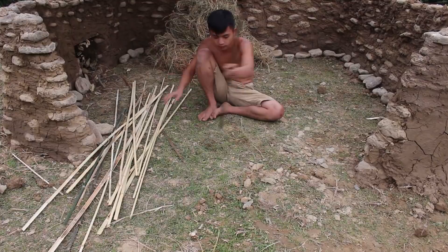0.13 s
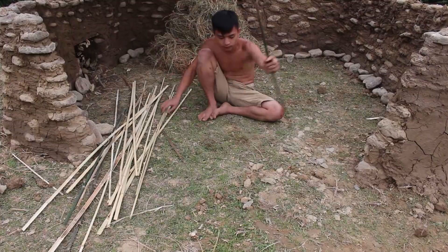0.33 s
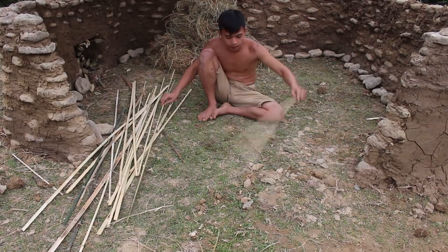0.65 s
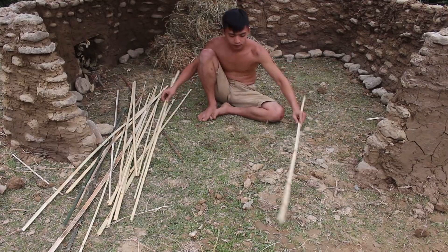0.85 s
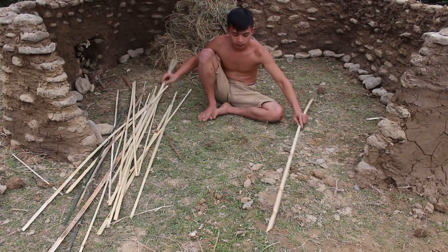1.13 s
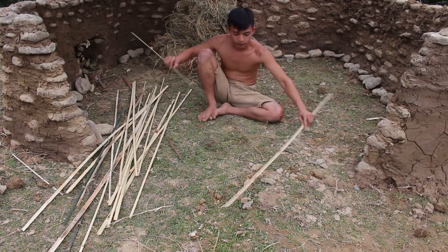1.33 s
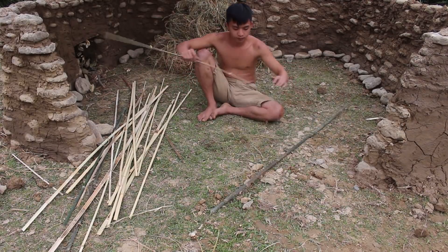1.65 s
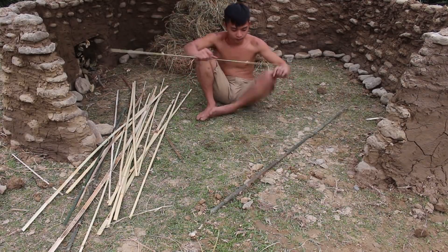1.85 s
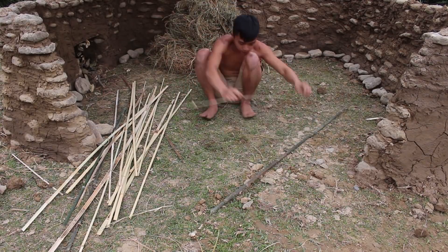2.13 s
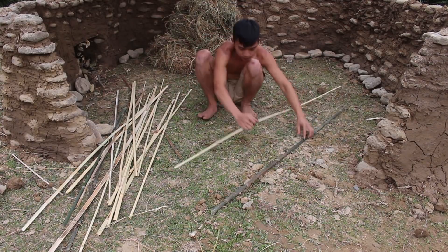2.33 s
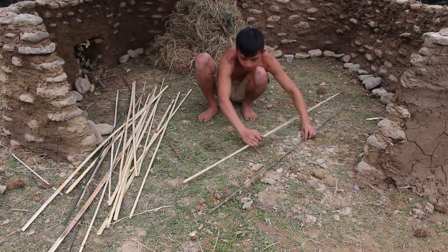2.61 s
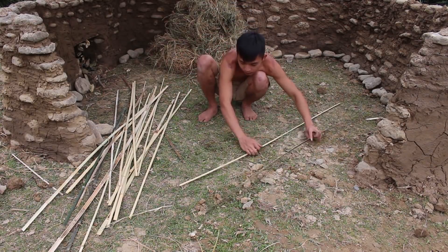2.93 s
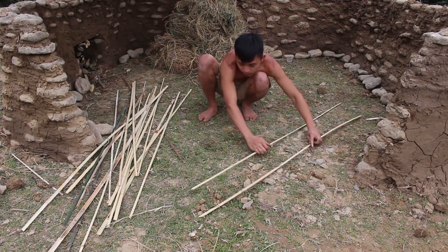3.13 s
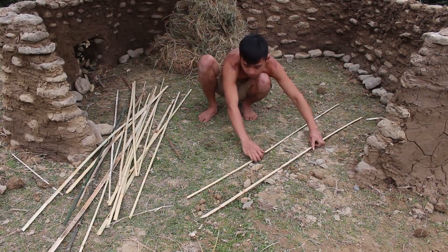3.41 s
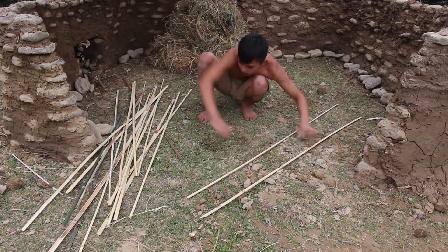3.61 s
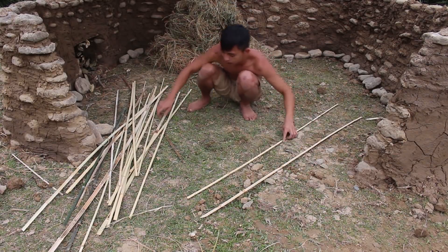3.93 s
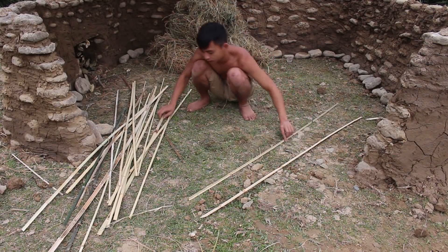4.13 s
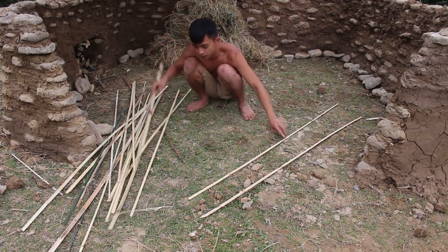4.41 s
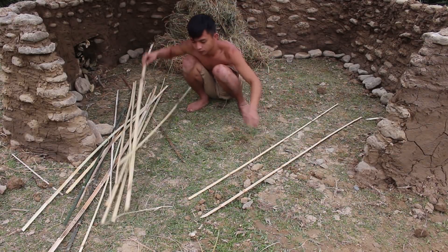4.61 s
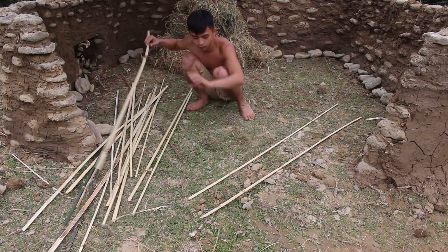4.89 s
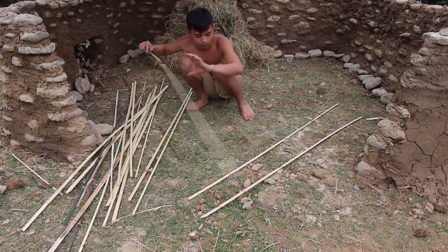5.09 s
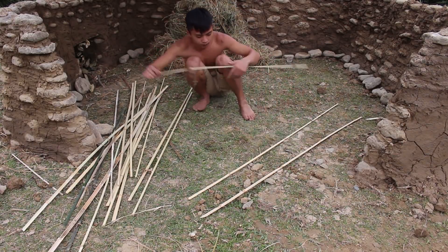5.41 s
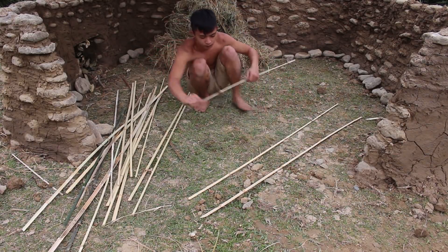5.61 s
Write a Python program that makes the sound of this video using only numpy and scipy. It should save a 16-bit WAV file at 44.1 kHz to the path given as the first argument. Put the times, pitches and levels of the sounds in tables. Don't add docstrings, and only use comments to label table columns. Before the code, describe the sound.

Thin split bamboo poles are laid on short grass in a small stone-walled yard: dry ticks, hollow little knocks and raspy slides in the first few seconds. After a near lull, a pole is dragged from the pile, rattling quickly and snapping free with a sharp crack. Faint grass brushing and one tiny falling bird note end it. A soft brook murmurs throughout. Close, slightly left-leaning stereo pickup with little bass.

```python
import sys
import numpy as np
from scipy import signal
from scipy.io import wavfile

SR = 44100
rng = np.random.default_rng(int(sys.argv[2]) if len(sys.argv) > 2 else 0)


def voltage_ratio(decibels):
    exponent = np.asarray(decibels, float) / 20
    return 10 ** exponent


def to_wav(sig):
    pcm = np.clip(np.atleast_2d(sig), -1, 1) * 32767
    pcm = np.round(pcm).astype(np.int16)
    wavfile.write(sys.argv[1], SR, pcm.T)


N = 253575


def in_time(rows):
    s, *columns = np.transpose(rows)
    return [np.interp(np.arange(N) / SR, s, c) for c in columns]


def at_hz(points, hz):
    f, value = np.transpose(points)
    return np.interp(np.log(hz), np.log(np.maximum(f, 1)), value)


def rms_one(x):
    return x / np.sqrt(np.mean(x ** 2) + 1e-20)


def drift(rate_hz):
    r = np.exp(-40 * np.pi * rate_hz / SR)
    noise = rng.standard_normal(N // 20 + 4002)
    slow = signal.lfilter([1], [1, -2 * r, r * r], noise)[4000:]
    return np.interp(np.arange(N) / 20, np.arange(len(slow)), rms_one(slow - slow.mean()))


def ring(x, hz, width_hz):
    r = np.exp(-np.pi * width_hz / SR)
    w = 2 * np.pi * hz / SR
    return signal.lfilter([0, np.sin(w)], [1, -2 * r * np.cos(w), r * r], x + 1e-18)


def modes(blow, table, scale, detune):
    total = 0
    for k, (hz, width_hz, db) in enumerate(table):
        total = total + (-1) ** k * voltage_ratio(db) * ring(blow, scale * hz * (1 + detune[k]), scale * width_hz)
    return total


def grains(shape, per_s, spread_db):
    size = voltage_ratio(spread_db * np.minimum(rng.exponential(1, shape), 4)) * rng.choice([-1, 1], shape)
    return size * (rng.random(shape) < per_s / SR)


def coloured(source, spectrum, patchy_db, flicker_hz, likeness, lean_db):
    out = 0
    edges_hz = 16500 * 2 ** (np.arange(-29, 1) / 3)
    for k, (low, high) in enumerate(zip(edges_hz, edges_hz[1:])):
        hz = np.sqrt(low * high)
        if not spectrum[0][0] < hz < spectrum[-1][0]:
            continue
        band = signal.butter(2, [low, high], "band", fs=SR, output="sos")
        mid, side = signal.sosfilt(band, source[k % 2])
        c = np.clip(at_hz(likeness, hz), -1, 1)
        gain = voltage_ratio(at_hz(spectrum, hz) + patchy_db * drift(flicker_hz))
        gain = gain * voltage_ratio(at_hz(lean_db, hz) / 2 * np.array([[1], [-1]]))
        out = out + gain * (np.sqrt(1 + c) * mid + np.sqrt(1 - c) * side * [[1], [-1]])
    return rms_one(out)


def brook():
    # f/Hz, density/dB
    wash_spectrum = [(15, -56), (26, -21), (48, -8), (97, -4.5), (221, -4), (289, -4.5), (331, -4.5),
                     (456, -6.5), (596, -4), (663, -3.5), (1290, -7.5), (1690, -4), (2600, -8.5),
                     (3130, -9.5), (15600, -26)]
    # f/Hz, correlation
    wash_likeness = [(60, 0.7), (130, 0.05), (290, -0.45), (640, 0.13), (1410, 0.23), (3100, -0.21),
                     (6820, -0.2), (15000, -0.17)]
    # f/Hz, lean/dB
    wash_lean = [(60, 2.5), (250, 1.5), (1000, 1), (4000, -1.5), (15000, 0.5)]
    wash = coloured(rng.standard_normal((2, 2, N)), wash_spectrum, patchy_db=1.2, flicker_hz=27,
                    likeness=wash_likeness, lean_db=wash_lean)
    born = grains((2, N), per_s=170, spread_db=4.5)
    dealt = rng.integers(0, 16, N)
    bubbles = 0
    for k, hz in enumerate(np.geomspace(400, 2700, 16)):
        onset = ring(born * (dealt == k), hz, 0.097 * hz)
        bubbles = bubbles + ring(onset, hz, 0.27 * hz) * hz ** 1.32
    return voltage_ratio(-51) * (0.91 * wash + 0.37 * rms_one(bubbles))


def bird():
    # t/s, f/Hz, level/dB
    whistle = [
        (5.36, 5750, -90),
        (5.38, 5680, -63),
        (5.43, 5350, -64),
        (5.47, 5150, -86),
    ]
    hz, db = in_time(whistle)
    return voltage_ratio(db) * (db > -89) * np.sin(2 * np.pi * np.cumsum(hz) / SR)


def yard(x):
    t60_s, level_db, cut_hz = 0.073, -10.5, 18000
    t = np.arange(round(.2 * SR)) / SR
    echoes = grains((2, len(t)), per_s=1800, spread_db=-1.0) * voltage_ratio(-60 * t / t60_s)
    echoes = echoes * (t > .003)
    echoes = signal.lfilter(*signal.butter(1, cut_hz, fs=SR), echoes)
    echoes /= np.sqrt(np.sum(echoes ** 2, axis=1, keepdims=True))
    return voltage_ratio(level_db) * signal.fftconvolve(x[None], echoes, axes=1)[:, :N]


def strokes():
    # peak t/s, fine rasp/dB, coarse rasp/dB, swell/s, fade/s (both over 20 dB)
    slides = [(0.0, -60.5, -72, .05, .15), (0.19, -62, -56.5, .03, .3), (0.35, -57, -58, 0.31, 0.17),
              (0.89, -55.5, -55, 0.075, 0.14), (0.99, -62, -67, .1, .12), (1.21, -48, -45, 0.059, 0.11),
              (1.49, -58, -50.5, 0.026, 0.26), (1.65, -72, -63, .04, 0.34), (1.77, -67, -60, .04, .2),
              (1.93, -60, -54, 0.24, .07), (2.06, -64, -58.5, 0.061, 0.27), (2.26, -57, -51, 0.055, 0.081),
              (2.42, -62, -62, 0.036, 0.11), (2.77, -63, -64, .04, 0.22), (2.95, -65, -60, .3, 0.46),
              (3.18, -66, -56, .06, .1), (3.315, -55.5, -59, .08, .25), (4.28, -57, -64, 0.071, .5),
              (4.46, -44.5, -53.5, 0.21, 0.35), (4.58, -36.5, -36.5, 0.13, 0.087),
              (4.69, -44.5, -44.5, .06, 0.15), (4.85, -46.5, -45.5, 0.054, 0.096),
              (4.94, -61, -56, 0.082, 0.063), (5.59, -61.5, -57.5, .08, 0.7)]
    t = np.arange(0, N + 64, 64) / SR
    s, fine_db, coarse_db, swell_s, fade_s = np.transpose(slides)[:, :, None]
    shape_db = -20 * np.where(t < s, (s - t) / swell_s, (t - s) / fade_s)
    levels = []
    for db, stir_db in [(fine_db, -73), (coarse_db, -66.5)]:
        power = np.sum(voltage_ratio(2 * (db + shape_db)), axis=0) + voltage_ratio(2 * stir_db)
        levels.append(np.interp(np.arange(N) / SR, t, 10 * np.log10(power)))
    return levels


def rustle(fine_db, coarse_db):
    # f/Hz, density/dB
    fine_spectrum = [(2940, -34), (5000, -1), (6020, -5.5), (6500, -7), (8280, -5), (10400, -3),
                     (15600, -8.5)]
    coarse_spectrum = [(710, -53), (1200, -6.5), (3560, 0), (3850, -6.5), (5730, -1.5), (5960, -12),
                       (8000, -6), (10400, -53), (17600, -120)]
    surge_db = 1.5
    slips = grains((2, 2, N), per_s=8000, spread_db=4.0) * voltage_ratio(surge_db * drift(45))
    fine = coloured(slips, fine_spectrum, patchy_db=1.2, flicker_hz=25,
                    likeness=[(1000, 0.81)], lean_db=[(1000, 0)])
    coarse = coloured(slips[::-1], coarse_spectrum, patchy_db=3.5, flicker_hz=26.4,
                      likeness=[(1000, 1.0)], lean_db=[(1000, 0)])
    return voltage_ratio(fine_db) * fine + voltage_ratio(coarse_db) * coarse


def soft_blows(rows, width_hz):
    size = 4096
    out, push = np.zeros(N + size), np.zeros(size)
    push[0] = 1
    for s, db, hz in rows:
        swell = ring(ring(push, hz, width_hz), hz, 3.6 * width_hz)
        at = round(s * SR)
        out[at:at + size] += voltage_ratio(db - 2.0) * swell / np.abs(swell).max()
    return out[:N]


def thuds():
    # t/s, peak level/dB, f/Hz
    landings = [
        (0.854, -45, 417),
        (0.87, -58, 406),
        (1.201, -52.5, 218),
        (1.474, -50.5, 229),
        (1.499, -53, 268),
        (2.233, -62, 243),
        (4.568, -52, 402),
        (4.68, -51.5, 250),
        (4.838, -50.5, 258),
    ]
    return soft_blows(landings, width_hz=36)


def knocks():
    # t/s, peak level/dB, f/Hz
    bends = [(0.583, -46, 1115), (0.85, -41, 850), (0.877, -41.5, 855), (0.866, -46, 803),
             (0.888, -41, 762), (1.171, -44, 790), (1.198, -40.5, 730), (1.472, -46, 820), (1.49, -46, 820),
             (2.231, -36, 800), (2.261, -43.5, 810), (4.55, -42.5, 860), (4.605, -45.5, 700),
             (4.66, -44.5, 685), (4.838, -51, 720)]
    return soft_blows(bends, width_hz=66)


def contacts(rows, chatter_s, tick, chatter, rise_s):
    # f/Hz, width/Hz, level/dB
    crack_modes = [(8450, 1530, 1.5), (10960, 3100, 6.5), (14900, 3600, 0)]
    edge_modes = [(5030, 2400, -1), (6500, 1250, 2)]
    # pitch ratio, width over ring pitch, level/dB
    wall_modes = [(m, m * w, db) for m, w, db in [(.6, 0.44, 6), (1, 0.15, 8.5), (1.5, 0.44, 10.5)]]
    size = 2048
    out = np.zeros(N + size)
    t = np.arange(size) / SR
    slips = rms_one(grains((len(rows), 3, size), per_s=20000, spread_db=1.5))
    detune = rng.normal(0, 1, (len(rows), 3))
    steep = signal.butter(2, 7400, "high", fs=SR, output="sos")
    envelope = np.exp(-t / max(chatter_s, 3e-4)) * (1 - np.exp(-t / rise_s))
    for (s, crack_db, hz, ring_db, edge_db), slip, d in zip(rows, slips, detune):
        blow = chatter * slip * envelope
        blow[:, 0] = tick * np.array([1, .6, .4])
        crack = signal.sosfilt(steep, modes(blow[0], crack_modes, 1, 0.039 * d))
        wall = modes(blow[1], wall_modes, hz, 0 * d)
        edge = modes(blow[2], edge_modes, 1, 0.016 * d)
        at = round((s + .0006) * SR)
        out[at:at + size] += voltage_ratio(crack_db) * crack + voltage_ratio(ring_db) * wall + voltage_ratio(edge_db) * edge
    return signal.sosfilt(signal.butter(3, 1100, "high", fs=SR, output="sos"), out[:N])


def taps():
    # t/s, crack level/dB, ring f/Hz, ring level/dB, edge level/dB
    laid = [(0.176, -43, 1460, -49, -35.5), (0.231, -47, 2400, -52, -39), (0.851, -30.5, 2280, -39, -26.5),
            (0.8544, -48, 3170, -38.5, -52), (1.1706, -28.5, 2010, -43, -27.5),
            (1.195, -38, 2600, -34.5, -45), (1.2006, -20.5, 3320, -28, -21.5), (1.208, -26, 3180, -34, -36),
            (1.216, -38, 1900, -40, -42), (1.472, -35, 2450, -39, -36), (1.4772, -40, 2460, -34.5, -25.5),
            (1.4964, -42, 2600, -43, -48), (1.66, -57, 1780, -42.5, -55), (1.753, -33, 2410, -35.5, -29),
            (2.2283, -21.5, 2900, -29, -15), (2.235, -45, 2300, -34, -50), (2.2608, -42, 2770, -43, -36),
            (2.2765, -33, 5130, -39, -19), (2.3975, -41, 1620, -52, -37.5), (2.4204, -42, 1730, -44.5, -39),
            (2.754, -38, 2800, -46, -40), (3.161, -46, 4860, -42, -53), (3.1755, -39, 3000, -45, -35),
            (3.198, -46, 2680, -48, -41)]
    pulled = [
        (4.0692, -42, 1590, -62, -62),
        (4.128, -47, 1660, -60, -63),
        (4.648, -29, 2370, -46, -42),
        (4.659, -30, 2830, -46, -44),
        (4.6712, -23, 2600, -34, -24),
        (4.6778, -24, 4100, -34, -23),
        (4.6873, -26, 3860, -34, -21),
        (4.8107, -36, 2690, -45, -27),
        (4.898, -26.5, 2960, -42.5, -38),
        (4.934, -34.5, 1570, -55, -40),
    ]
    rattling = [
        (4.552, -36, 3000, -40, -38),
        (4.5605, -22.5, 4940, -34, -21),
        (4.567, -26, 4840, -33, -30),
        (4.576, -28, 2400, -37.5, -34),
        (4.6004, -31, 3540, -38, -29),
        (4.612, -28, 3600, -46, -37),
        (4.622, -33, 2300, -47, -42),
    ]
    freed = [
        (4.8333, -6, 3270, -28.5, -10),
    ]
    scuffs = [(0.2573, -53, 3860, -46.5, -59), (0.871, -31, 2650, -56, -51), (0.88, -34, 1560, -54, -39),
              (1.246, -36, 2400, -44, -50), (1.293, -37, 3200, -45, -44), (1.6404, -56, 1660, -45, -64),
              (2.075, -43, 2150, -49, -56), (2.2705, -29, 3120, -41, -27), (2.281, -28, 5000, -32, -32),
              (2.75, -40, 2150, -57, -31.5), (2.964, -41, 2830, -54, -61), (3.192, -42, 2770, -41.5, -47),
              (4.3745, -31, 4760, -45, -55), (4.49, -30, 3180, -41, -39), (4.565, -14.5, 4890, -28, -34),
              (4.621, -22, 2250, -46, -48), (4.7162, -22, 3270, -51, -49), (4.765, -29.5, 3400, -45, -32),
              (4.784, -47, 1980, -44.5, -45), (4.8351, -27, 3150, -29, -9), (4.853, -25, 2550, -45, -48),
              (4.8991, -41, 2230, -52, -22), (4.9394, -45, 1540, -59, -28.5), (5.079, -58, 2340, -46, -64)]
    # t/s, crack level/dB
    stems = [(0.372, -48), (0.512, -45.5), (0.577, -47), (0.92, -54), (0.941, -45), (0.98, -46),
             (1.012, -48), (1.2324, -38), (1.275, -48), (1.53, -46), (1.562, -45), (1.6, -51), (2.676, -46),
             (2.828, -46), (3.286, -46), (4.025, -45), (4.252, -46), (4.314, -51), (4.918, -40),
             (4.961, -44), (5.525, -50)]
    faint = [(s, db, 2600, db - 12, db - 14) for s, db in stems]
    hard = contacts(laid, 0.0031, tick=1, chatter=.13, rise_s=0.00034)
    hard = hard + contacts(pulled, 0.0034, tick=1, chatter=0.12, rise_s=.0004)
    hard = hard + contacts(rattling, 0.0052, tick=0.43, chatter=0.24, rise_s=.0015)
    hard = hard + contacts(freed, 0.0036, tick=1, chatter=0.083, rise_s=0.00043)
    hard = hard + contacts(faint, 0.0024, tick=.4, chatter=0.28, rise_s=0.0011)
    soft = contacts(scuffs, 0.0038, tick=0, chatter=0.89, rise_s=0.0017)
    return voltage_ratio(0.5) * hard + voltage_ratio(-14.0) * soft


def scene():
    hit_lean_db, rustle_lean_db = 3, 2
    half = np.array([[.5], [-.5]])
    hits = taps() + knocks() + thuds()
    poles = hits * voltage_ratio(hit_lean_db * half) + rustle(*strokes()) * voltage_ratio(rustle_lean_db * half)
    return poles + yard(hits) + brook() + bird()


def roll_off(x):
    return signal.sosfilt(signal.butter(12, 16570, fs=SR, output="sos"), x)


def record(dry):
    low = signal.butter(2, 38.8, "high", fs=SR, output="sos")
    top = signal.cheby2(12, 42, 16220, fs=SR, output="sos")
    mix = signal.sosfilt(np.vstack([low, top]), dry)
    return roll_off(mix)


dry = scene()
out = record(dry)
to_wav(out)
```